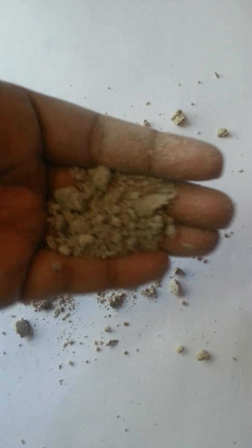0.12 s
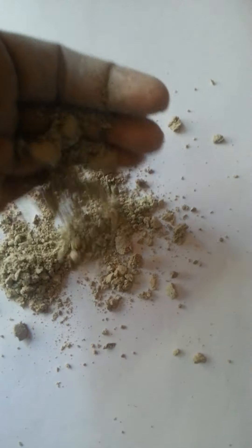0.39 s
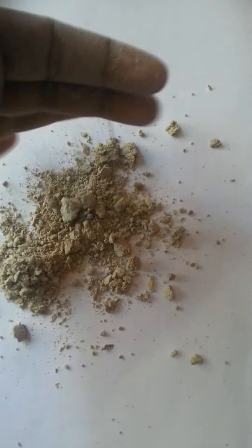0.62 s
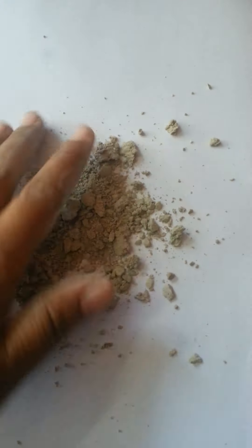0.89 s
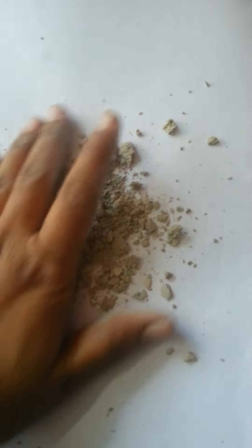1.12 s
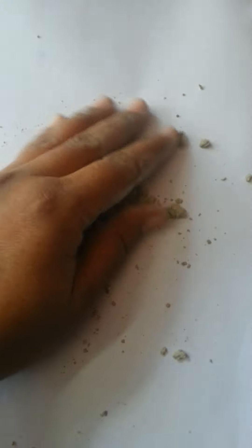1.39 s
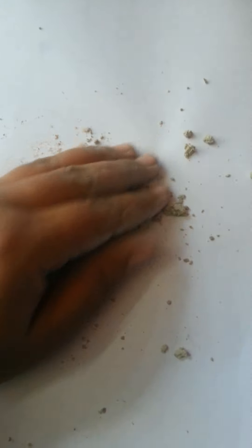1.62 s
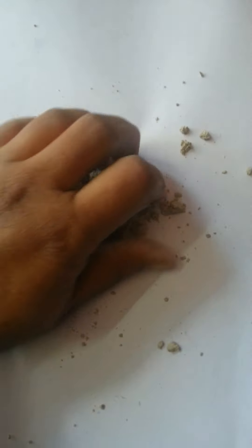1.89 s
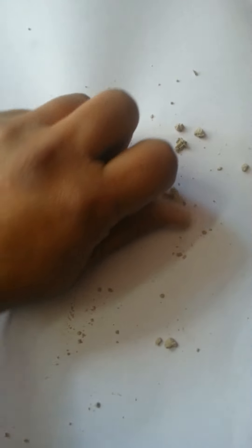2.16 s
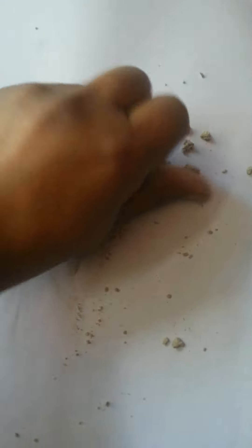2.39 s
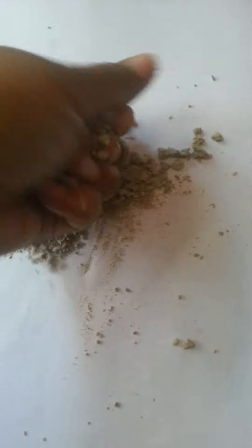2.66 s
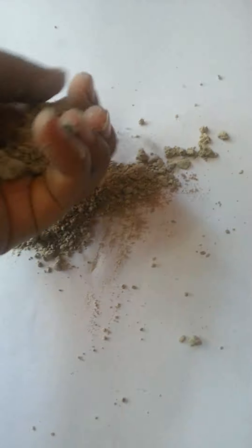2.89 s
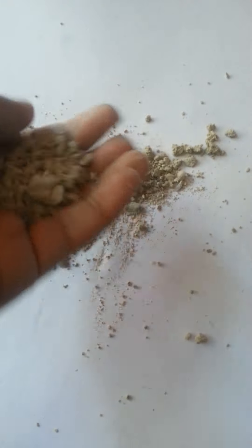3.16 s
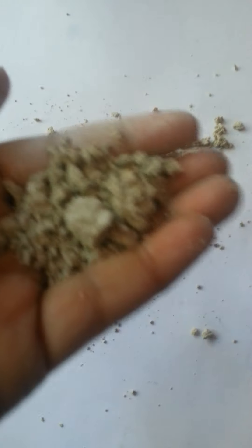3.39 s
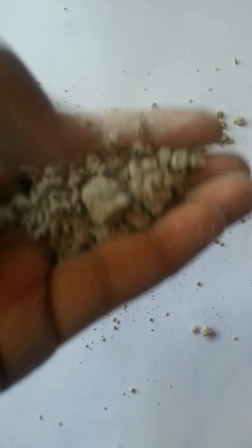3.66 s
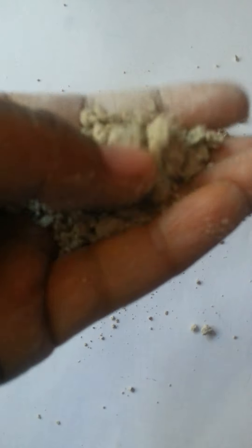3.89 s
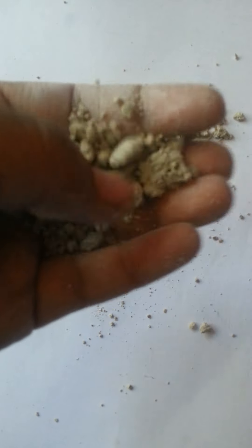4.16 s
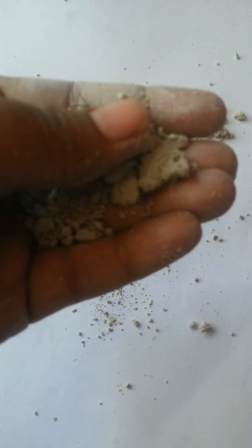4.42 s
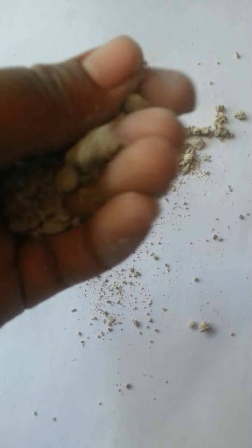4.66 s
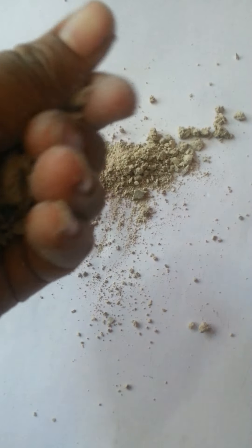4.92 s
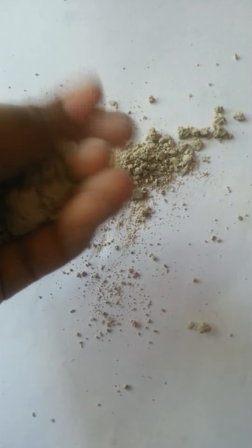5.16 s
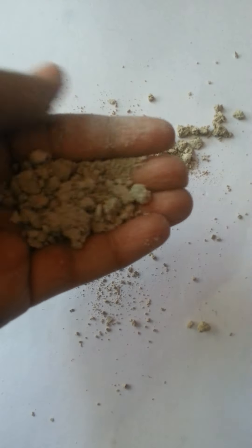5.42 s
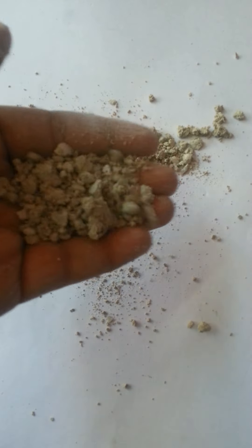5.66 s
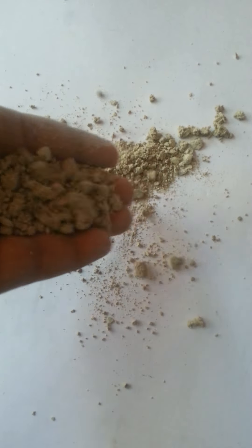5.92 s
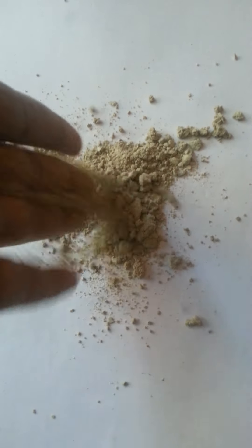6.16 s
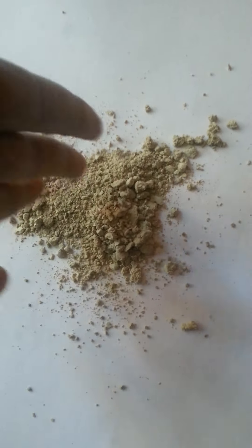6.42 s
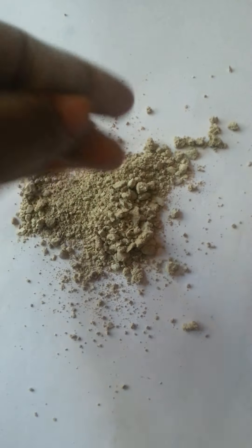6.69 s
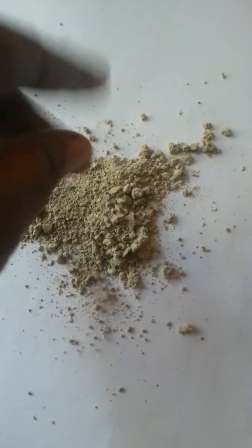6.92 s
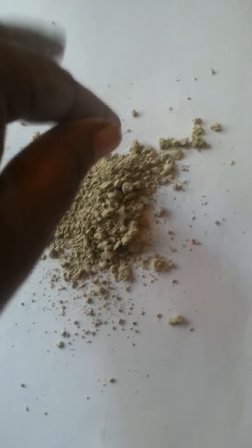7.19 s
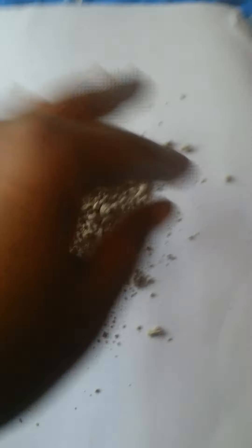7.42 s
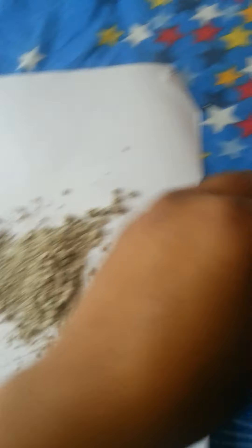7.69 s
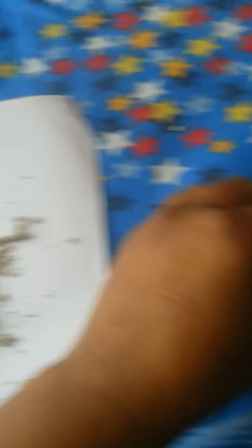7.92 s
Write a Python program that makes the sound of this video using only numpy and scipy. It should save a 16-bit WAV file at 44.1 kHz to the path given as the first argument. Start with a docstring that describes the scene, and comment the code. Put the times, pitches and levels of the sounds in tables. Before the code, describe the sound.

A quiet room with low fluttering rumble and soft hiss, a phone microphone very close above paper; ticks are bright on the right, duller on the left. From about 0.35 to 0.9 s dry crumbs pour down in a crackling shower, strongest near 0.5-0.65, with sharp clicks and papery thuds. From 1.05 to 2.75 s a palm sweeps the powder: dense, bright, gritty scraping in uneven strokes, loudest around 1.2, getting lower and more muffled later, with slight grip rumble. Around 2.95-3.4 s crumbs drop back in a brief patter, then sparse clicks, with a crisp crunchy burst at 4.33. Three faint hoarse upward bird chirps come from outside at 4.6, 4.8 and 5.1. From 5.2 drops resume, building to a fuller shower at 5.8-6.4. Stray ticks end near 7.0; faint dull handling bumps follow at 7.2, 7.65 and 7.95 with low rumble.

```python
"""Crumbled slate pours onto a sheet of paper in showers, is swept together by the palm and falls again.
Each grain is an impulse: it ticks, knocks on the surface below and excites the modes of the sheet.
A phone just above has two ports: grain ticks are bright in the right one, dull in the left.
Decaying sines thump in its case and low noise rumbles from the grip; filtered noise is the room's rumble.
Outside, gliding sines chirp as a bird; a few faint tones swell from further off."""
import sys
import numpy as np
from scipy import signal
from scipy.fft import rfft, irfft
from scipy.io import wavfile
from scipy.ndimage import uniform_filter1d

SR = 44100
rng = np.random.default_rng(int(sys.argv[2]) if len(sys.argv) > 2 else 0)


def output_pcm(signal):
    """Save a mono or channel-first signal as 16-bit PCM at the path in sys.argv[1].

    Samples are clipped to [-1, 1] before scaling.
    """
    pcm = np.clip(np.atleast_2d(signal).T, -1, 1) * 32767
    wavfile.write(sys.argv[1], SR, np.round(pcm).astype(np.int16))


def ratio_of_db(decibels):
    """Turn decibels (scalar or array-like) into linear amplitude factors; 0 dB maps to 1."""
    return 10 ** (np.asarray(decibels, float) / 20)


N = 355446
T = np.arange(N) / SR

# showers of crumbs onto the sheet: start of hold t/s, hold t/s, tick drive level/dB,
# heaviness level/dB (bigger crumbs boom more)
SHOWERS = [(0.1, 0.098, -51, -26), (0.432, 0.12, -38.5, 9), (0.522, 0.0078, -23, 1), (0.6, 0.016, -33.5, 8),
           (0.657, 0.021, -27, -5.5), (0.819, 0.1, -35, -13), (2.939, 0.013, -36.5, 9.5),
           (2.98, 0.081, -35, -0.5), (3.136, 0.078, -34.5, 1), (3.259, 0.059, -34, -3),
           (3.35, 0.046, -40.5, -9), (3.45, 0.048, -41, -11), (3.53, 0.02, -46, -15),
           (3.72, 0.14, -50.5, -10), (3.86, 0.076, -41, 4), (4.329, 0.066, -23.5, -1.5),
           (5.212, 0.077, -37, 1), (5.517, 0.0038, -41, -11), (5.678, 0.037, -30, -6.5),
           (5.79, .04, -42.5, 4), (5.858, 0.05, -25.5, 3), (6.03, 0.032, -47.5, 12),
           (6.09, 0.087, -29, 7.5), (6.17, 0.082, -26, 0.5), (6.285, 0.048, -25.5, -5.5),
           (6.36, 0.018, -35, -3), (6.44, 0.079, -57, 15), (6.566, 0.043, -44, -6),
           (6.739, 0.57, -49.5, -24), (7.02, 0.014, -36.5, -2), (7.12, 0.0089, -43.5, 18)]
# the palm sweeps the powder together: t/s, scrape drive level/dB,
# heaviness level/dB (how hard the palm presses the sheet)
SWEEP = [(0.979, -57, -20), (1.03, -40.5, 5.5), (1.128, -24.5, 2), (1.21, -21, -5), (1.51, -24.5, -5),
         (1.599, -30.5, 0.5), (1.78, -27, -4), (1.81, -35, 5), (1.87, -24, -3.5), (2.02, -32, 9.5),
         (2.17, -27.5, 5.5), (2.43, -36.5, 14.5), (2.49, -31, -2.5), (2.57, -40, 8), (2.73, -39, 7.5),
         (2.9, -55, -2), (2.95, -95, 8)]
# single lumps landing: t/s, tick level/dB, sheet boom re tick level/dB, knock re tick level/dB
LUMPS = [(0.3496, -28.5, -36, -12), (0.5037, -16, -44, -14), (0.524, -16.5, -6, -15),
         (0.569, -21.5, -14, -8), (0.581, -24.5, 0.5, -9), (0.6017, -24, 1.5, -18), (0.648, -14, -31, -43),
         (0.772, -21.5, -20, -5.5), (0.7886, -21, -19, -4.5), (0.8763, -24, -26, -13),
         (0.899, -22, -23, -20), (1.423, -22, -23, -5.5), (1.986, -34, -11, 2), (2.303, -23, -10, -8),
         (2.4912, -26, -31, -31), (2.6977, -36.5, -8, 5), (2.9244, -34, -2, -1), (2.9746, -12, -18, -12),
         (3.143, -15, -19, -32), (3.151, -23.5, 1.5, 7), (3.16, -19, -27, -38), (3.268, -26, -14, -3),
         (3.2943, -25.5, -28, -14), (3.4404, -13.5, -37, -17), (3.5856, -22.5, -22, -33),
         (3.671, -28.5, -35, -15), (3.7053, -22, -24, -43), (3.885, -20.5, -9, -0.5),
         (4.1162, -25.5, -13.5, -14), (4.289, -19, -44, -15), (4.3264, -13.5, -39, -12),
         (4.3368, -23, -2, 9.5), (4.3586, -30, -31, -32), (4.366, -24, -27, -6), (4.4052, -25, -17, -8),
         (4.4546, -24, -14.5, -3), (5.2, -20.5, -46, -5), (5.2434, -20.5, -33, -9.5),
         (5.5245, -26, -20, -13), (5.679, -28, -22, -36), (5.8361, -20.5, -3.5, -12),
         (5.8583, -20, -41, -17), (5.88, -13.5, -6.5, -19), (5.957, -25.5, -10, -10),
         (6.013, -20.5, -19, -11), (6.0859, -23, -7, -1.5), (6.116, -19.5, -11, -6), (6.1495, -22, -21, -2),
         (6.2095, -18, -10, -31), (6.2831, -14, -15.5, -48), (6.3143, -19, -36, -42),
         (6.333, -23, -11.5, -26), (6.839, -32, -30, -24), (6.8435, -24, -26, -18), (7.0015, -17, -9.5, -6),
         (7.0172, -18.5, -17, -8), (7.654, -45.5, 9.5, 4)]
# modes of the paper sheet: f/Hz, width f/Hz, relative level/dB
SHEET_MODES = [(173, 39, 0), (342, 79.7, 4), (407.4, 136, -2.5)]
# modes of the knock on the surface below: f/Hz, width f/Hz, relative level/dB
KNOCK_MODES = [(564, 130, -7.5), (996, 204, 8.5), (2200, 1700, -6)]
# colour of the ticks in each port: f/Hz, gain level/dB
RIGHT_PORT = [(500, -19), (2500, -17), (4400, -10), (5500, -5), (6350, 2), (7300, -7), (9000, -15.5),
              (14000, -30.5)]
LEFT_PORT = [(500, -23), (2000, -28), (4500, -22.5), (6500, -26.5), (8500, -56), (14000, -40)]
# the phone bumped in the hand: t/s, relative level/dB, f/Hz
BUMPS = [(4.05, -42, 310), (7.241, -49.5, 172), (7.653, -42.5, 208), (7.949, -36.5, 153)]
# the phone sways in the hand: middle t/s, half length t/s, level before the port gains/dB
SWAYS = [(2.25, 0.36, -54), (5.883, 0.25, -66), (7.95, 0.29, -58.5)]
# bird chirps, gliding up: start t/s, length t/s, nominal lowest f/Hz, nominal top f/Hz, relative level/dB
CHIRPS = [(4.56, .15, 4700, 6350, -51.5), (4.8, .165, 4500, 6350, -49.5), (5.06, .145, 4550, 6300, -50.5)]
# brief faint tones from further off: start t/s, length t/s, mean f/Hz, relative level/dB
TONES = [(0.139, 0.1, 404, -50.5), (4.081, 0.11, 593, -53), (7.326, 0.065, 8220, -51)]
# spectrum of the room's rumble: f/Hz, relative level/dB
RUMBLE = [(18, -41), (30, -15.5), (144, 1), (292, -10.5), (349, -14), (640, -20.5), (792, -19), (1500, -35),
          (3300, -64)]

DUST_DB = -57.5  # drive of loose dust settling all the time
SHOWER_PER_S, SWEEP_PER_S, SETTLE_PER_S = 550, 6000, 1900  # grains per s at each spot
SHOWER_RISE_DB_PER_S, SHOWER_FALL_DB_PER_S = 1000, 338
STRAGGLERS_DB, STRAGGLERS_DB_PER_S = -12, 87  # the last crumbs trail on: start re hold, and fall
BOOM_DB, KNOCK_DB = -7.5, -14  # drive of sheet and knock re ticks, at heaviness 0 dB
KNOCK_SHARE = 0.53  # share of the heaviness that the knock follows
LUMP_TICK_DB, LUMP_KNOCK_DB, LUMP_BOOM_DB = 19.5, 21, 32  # blow strength into each path
SHEET_LEFT_DB, KNOCK_LEFT_DB = 6.5, -5.5  # left port re right
RUMBLE_DB = -57.5  # mean level of the shared part in the right port


def colour(x, points):
    """Minimum-phase filter: folding the cepstrum of the (f/Hz, gain/dB) points makes it causal."""
    hz, db = np.transpose(points)
    grid = np.linspace(1, SR / 2, 1025)
    log_gain = np.interp(np.log(grid), np.log(hz), db) * np.log(10) / 20
    cepstrum = irfft(log_gain)
    cepstrum[1:1024] *= 2
    cepstrum[1025:] = 0
    response = irfft(np.exp(rfft(cepstrum)))
    return signal.fftconvolve(x, response)[:N]


def ring(x, modes):
    """Modal superposition: resonances in parallel, with alternating sign."""
    out = 0
    for k, (hz, width, db) in enumerate(modes):
        b, a = signal.iirpeak(hz, hz / width, SR)
        out = out + (-1) ** k * ratio_of_db(db) * signal.lfilter(b, a, x)
    return out


def unit(x):
    """Normalisation to rms 1."""
    return x / np.sqrt(np.mean(x ** 2))


def walk(rate):
    """Random modulation: levels held 1 / rate s, smoothed twice; spread near 1."""
    hold = int(SR / rate)
    steps = np.repeat(rng.standard_normal(N // hold + 1), hold)
    return 1.4 * uniform_filter1d(uniform_filter1d(steps, hold), hold)[:N]


def late(x, ms):
    """Propagation delay: the same sound, ms later."""
    k = int(ms * SR / 1000)
    return np.concatenate([np.zeros(k), x[:N - k]])


def motion():
    """Exponential envelopes: power and heaviness of each shower, the sweep and the dust, one row each."""
    t = T[::64]
    start, held, db, heavy_db = np.transpose(SHOWERS)[:, :, None]
    rise_db = -SHOWER_RISE_DB_PER_S * np.maximum(start - t, 0)
    since = np.maximum(t - start - held, 0)
    fall_db = np.maximum(-SHOWER_FALL_DB_PER_S * since, STRAGGLERS_DB - STRAGGLERS_DB_PER_S * since)
    showers_db = db + rise_db + fall_db
    at, scrape_db, press_db = np.transpose(SWEEP)
    sweep_db = np.interp(t, at, scrape_db, -120, -120)
    power = ratio_of_db(2 * np.vstack([showers_db, sweep_db, DUST_DB + 0 * t]))
    heaviness_db = np.vstack([heavy_db + 0 * t, np.interp(t, at, press_db), 0 * t])
    return t, power, heaviness_db


def grains(rate, spread_db):
    """Shot noise: random impacts of either sign, a few much larger than most; power near 1 at any rate."""
    share = rate / SR
    touch = rng.random(N) < share
    size = ratio_of_db(spread_db * np.minimum(rng.exponential(size=N), 3))
    sign = rng.standard_normal(N)  # varies the strength too
    return touch * size * sign / np.sqrt(share * uniform_filter1d(size ** 2, size=SR // 4))


def ports(tick, knock, boom, lag_ms):
    """Reflection and path difference: the hand throws the tick back, the left port hears all later."""
    tick = tick + .05 * late(tick, 1.236)
    # a loose sheet radiates little below its first mode
    boom = signal.lfilter(*signal.butter(2, 130, "high", fs=SR), ring(boom, SHEET_MODES))
    knock = ring(knock, KNOCK_MODES)
    right = colour(tick, RIGHT_PORT) + knock + boom
    left = colour(tick, LEFT_PORT) + ratio_of_db(KNOCK_LEFT_DB) * knock + ratio_of_db(SHEET_LEFT_DB) * late(boom, .12)
    return np.array([late(left, lag_ms), right])


def grit():
    """Superposed shot noise from four spots on the heap, each with its own path to the two ports."""
    t, power, heaviness_db = motion()
    total = power.sum(axis=0)
    part = power / total

    def smooth(v):
        """Linear interpolation to the sample rate."""
        return np.interp(T, t, v)

    heavy_db = smooth((part * heaviness_db).sum(axis=0))
    # dust rubbed under the palm is denser, brighter and more even than falling crumbs, which clump
    sweep, settle = smooth(part[-2]), smooth(part[-1])
    rate = SHOWER_PER_S * (1 - sweep - settle) + SWEEP_PER_S * sweep + SETTLE_PER_S * settle
    evenness = 1 - .5 * sweep
    clumps_db = 2.6 * evenness * walk(140)
    force = smooth(np.sqrt(total)) * ratio_of_db(clumps_db)
    out = 0
    # spots differ in lag and in brightness (edge)
    for lag_ms, edge in ((.08, -.2), (.18, 0), (.26, .2), (.4, .5)):
        push = grains(rate, spread_db=3.4 - .5 * (sweep + settle)) * force
        tick = push - (edge + 0.41 * sweep) * np.diff(push, 2, prepend=0, append=0)
        # only some grains thud through to the surface below
        thud = push * unit(ratio_of_db(4 * evenness * walk(200)))
        knock = thud * ratio_of_db(KNOCK_DB + KNOCK_SHARE * heavy_db)
        boom = thud * ratio_of_db(BOOM_DB + heavy_db)
        out = out + ports(tick, knock, boom, lag_ms)
    return out


def lumps():
    """Impulse excitation: a lump lands with a sharp blow and sheds crumbs for a few ms."""
    tick, knock, boom = np.zeros((3, N + SR))
    after = np.arange(SR // 50) / SR
    for s, db, boom_db, knock_db in LUMPS:
        touch = rng.random(len(after)) < .15
        crumbs = .35 * rng.standard_normal(len(after)) * touch * np.exp(-after / .0022)
        crumbs[0] = -1  # the blow itself
        at = slice(int(s * SR), int(s * SR) + len(after))
        tick[at] += ratio_of_db(db + LUMP_TICK_DB) * crumbs
        knock[at] += ratio_of_db(db + knock_db + LUMP_KNOCK_DB) * crumbs
        boom[at] += ratio_of_db(db + boom_db + LUMP_BOOM_DB) * crumbs
    # a hard edge on paper is brighter than loose grit
    tick = tick - 0.48 * np.diff(tick, 2, prepend=0, append=0)
    return ports(tick[:N], knock[:N], boom[:N], 0.28)


def bumps():
    """Damped oscillation: a dull thump of a few cycles in the case, mostly at the left port."""
    out = 0
    for s, db, hz in BUMPS:
        t = np.maximum(T - s, 0)
        envelope = hz * t * np.exp(-1.6 * hz * t)
        out = out + ratio_of_db(db + 21.0) * envelope * np.sin(-2 * np.pi * hz * t)
    return out * np.array([[1], [.3]])


def sways():
    """Low-frequency noise under bell-shaped envelopes: the grip rumbles, more at the left port."""
    deep = unit(colour(rng.standard_normal(N), [(25, -7), (45, -2.0), (90, 7), (160, -44)]))
    level = sum(ratio_of_db(db) * np.exp(-((T - s) / half) ** 2) for s, half, db in SWAYS)
    return deep * level * np.array([[1.6], [.7]])


def bird():
    """Frequency modulation: hoarse upward glides that level off; a second, lower voice follows each."""
    out = 0
    for s, length, hz0, hz1, db in CHIRPS:
        for lag_s, ratio in ((0, 1), (.024, .98)):
            voice_s = length - lag_s
            x = np.clip((T - s - lag_s) / voice_s, 0, 1)
            glide = np.sin(np.pi / 2 * np.minimum(x * voice_s / (.7 * length), 1)) ** 2
            hz = ratio * (hz0 + (hz1 - hz0) * glide)
            phase = 2 * np.pi * np.cumsum(hz * (1 + .018 * walk(500))) / SR
            hoarse = ratio_of_db(2.5 * walk(300)) * np.sin(phase)
            out = out + ratio_of_db(db) * np.sin(np.pi * x) ** 0.4 * (0.25 + x) * hoarse
    # a short diffuse tail: exponentially decaying noise
    t = T[:SR // 4]
    tail = rng.standard_normal(len(t)) * np.exp(-t / .03)
    out = out + .03 * signal.fftconvolve(out, tail)[:N]
    return out * np.array([[.15], [1]])


def tones():
    """Narrow-band modulation: soft swells around one pitch, wavering in pitch and level."""
    out = 0
    for s, length, hz, db in TONES:
        swell = np.sin(np.pi * np.clip((T - s) / length, 0, 1))
        phase = 2 * np.pi * np.cumsum(hz * (1 + .02 * walk(hz / 10))) / SR
        out = out + ratio_of_db(db) * swell * ratio_of_db(3 * walk(hz / 20)) * np.sin(phase)
    return out * np.array([[1], [.8]])


def room():
    """Partial coherence: low rumble that flutters, one part shared by the ports and one part private."""
    both, left, right = (unit(colour(rng.standard_normal(N), RUMBLE)) for _ in range(3))
    level = ratio_of_db(RUMBLE_DB + 2.2 * walk(14))
    return level * np.array([ratio_of_db(4.0) * (late(both, 0.53) + 0.62 * left), both + 0.66 * right])


def scene():
    """Linear superposition of all sources at the two ports (left, right)."""
    return grit() + lumps() + bumps() + sways() + bird() + tones() + room()


def roll_off(x):
    """The treble ends steeply here."""
    return signal.sosfilt(signal.butter(12, 15640, fs=SR, output="sos"), x)


def record(dry):
    """Level-dependent gain: a suppressor turns the hiss down as the treble goes quiet; the top is cut."""
    treble = signal.sosfilt(signal.butter(2, 3000, "high", fs=SR, output="sos"), dry[1])
    treble_db = 10 * np.log10(uniform_filter1d(treble ** 2, size=SR // 25) + 1e-9)
    open_db = np.clip(.5 * (treble_db + 52), -10, 4)
    hiss = rng.standard_normal(dry.shape)
    # the right port's cavity lifts the air noise as well
    hiss[1] = ratio_of_db(-2.0) * hiss[1] + ring(hiss[1], [(7140, 670, 10.9)])
    low_pass = signal.ellip(8, .3, 44, 14550, fs=SR, output="sos")
    mix = signal.sosfilt(low_pass, dry + ratio_of_db(-54.5 + open_db) * hiss)
    return roll_off(mix)


dry = scene()
out = record(dry)
output_pcm(out)
```